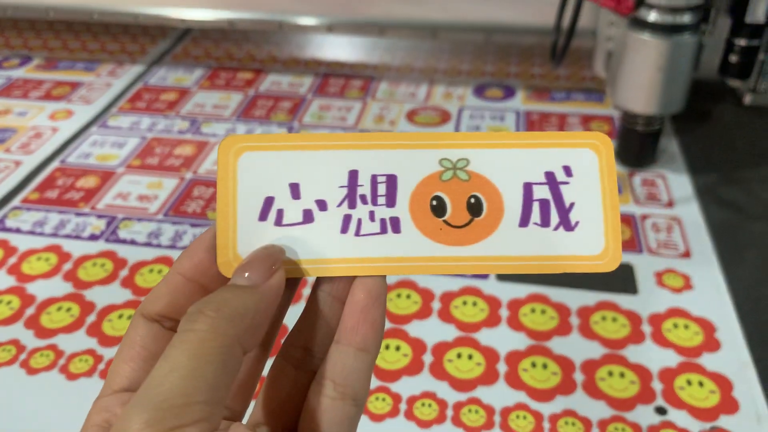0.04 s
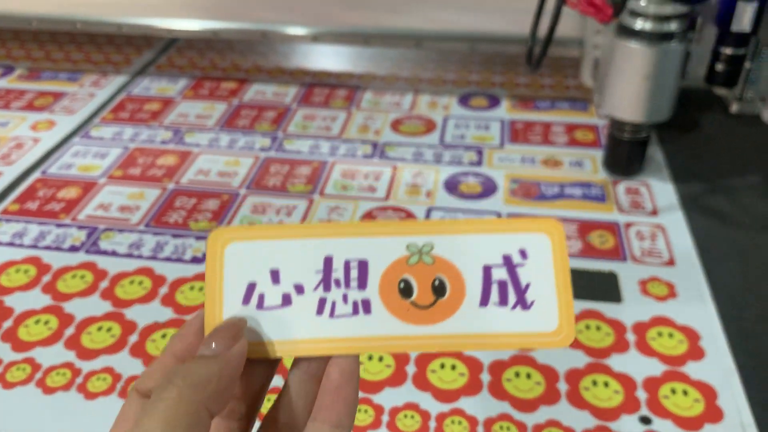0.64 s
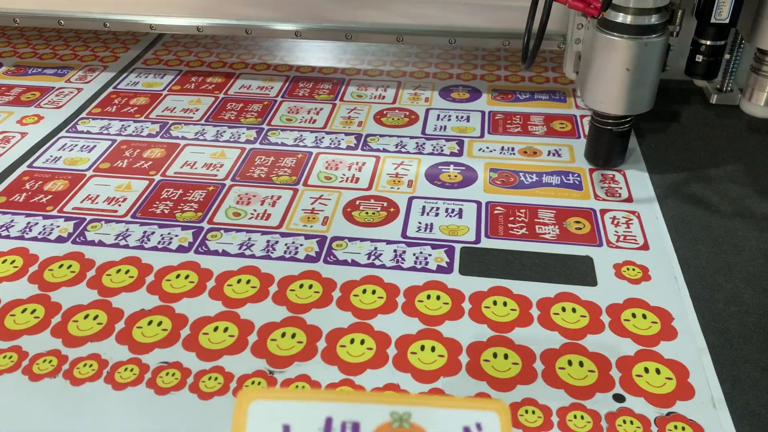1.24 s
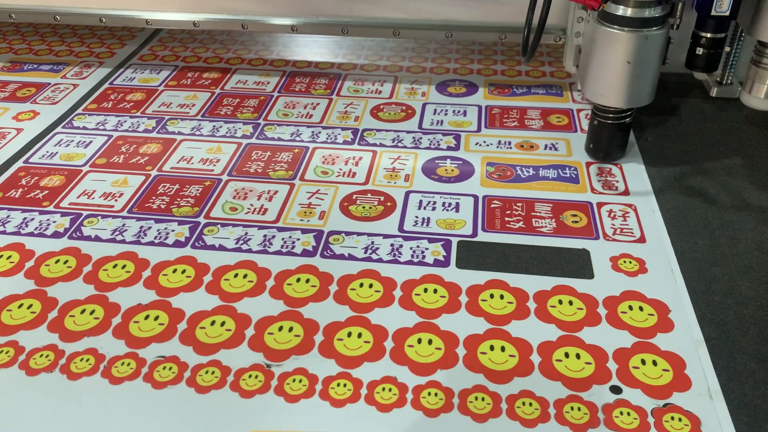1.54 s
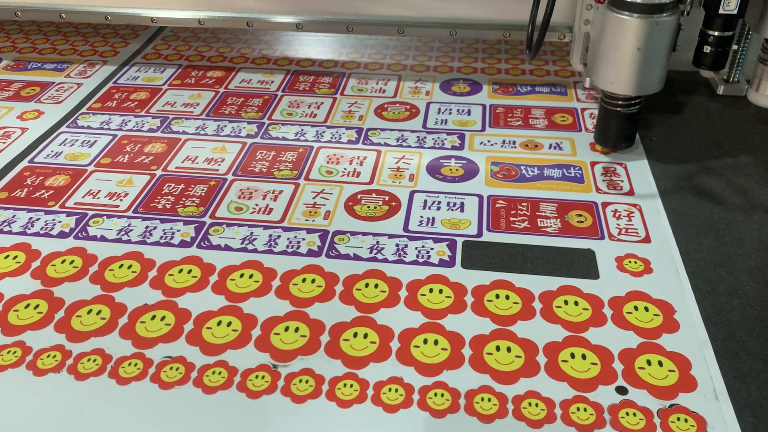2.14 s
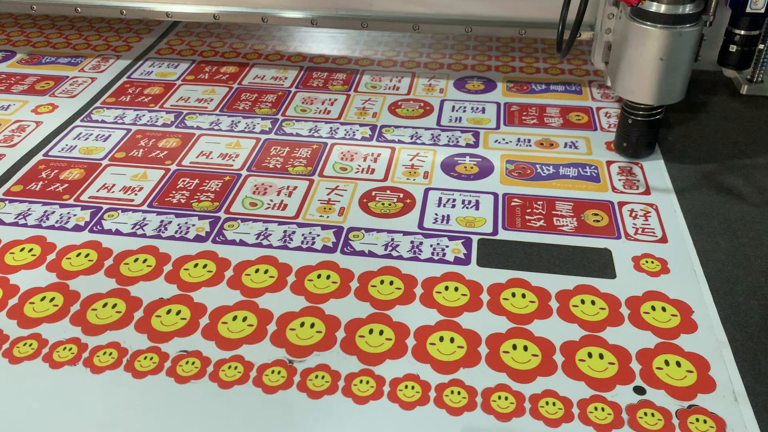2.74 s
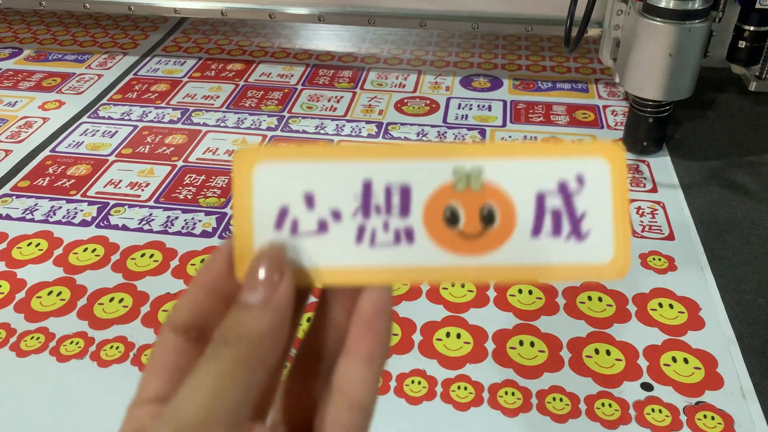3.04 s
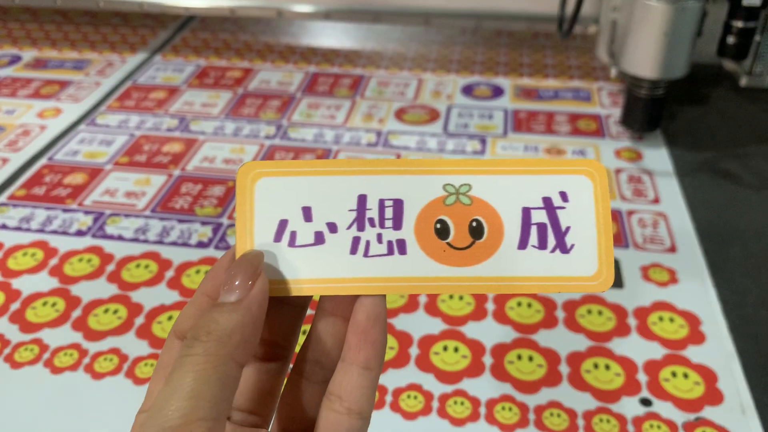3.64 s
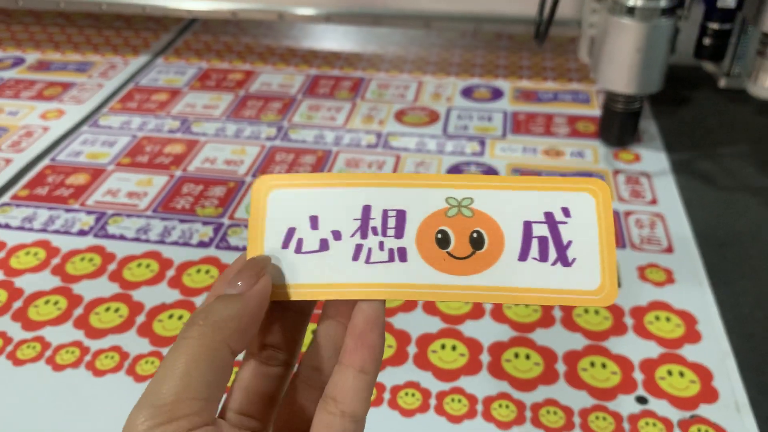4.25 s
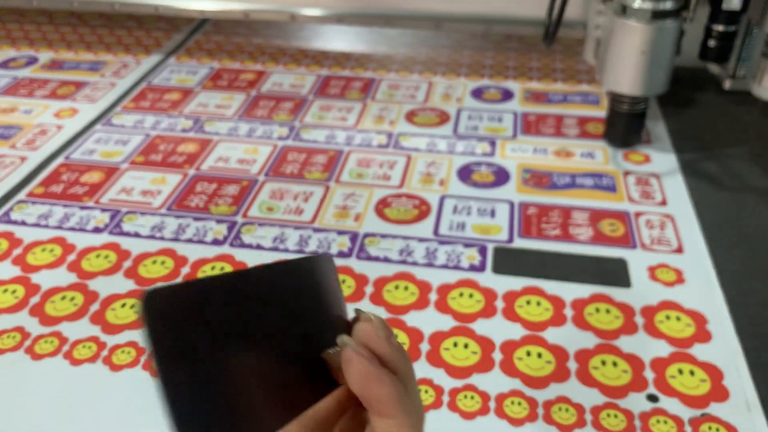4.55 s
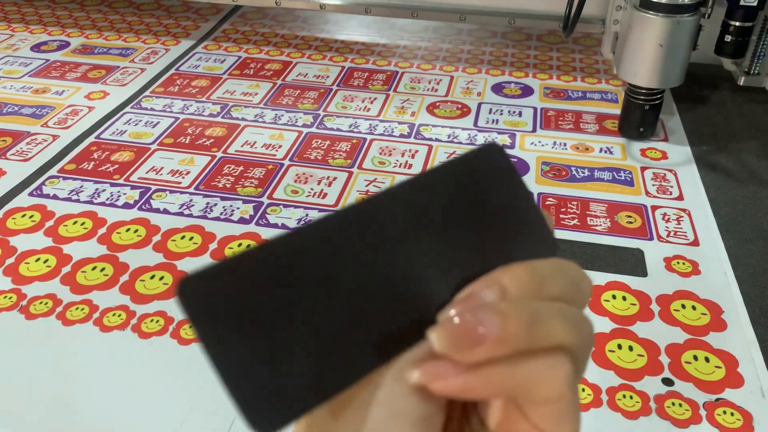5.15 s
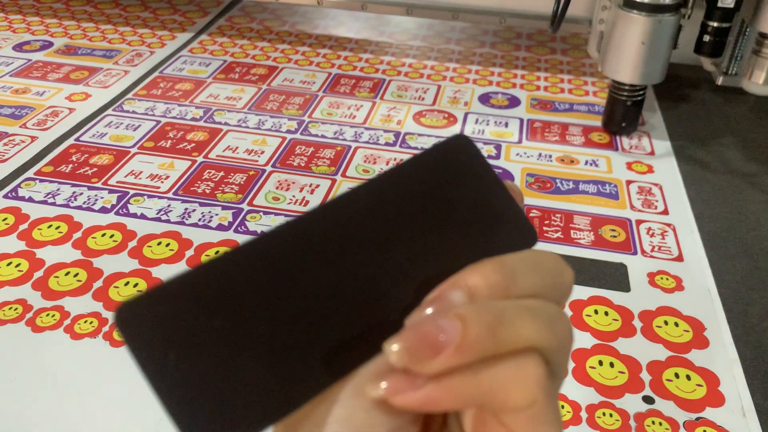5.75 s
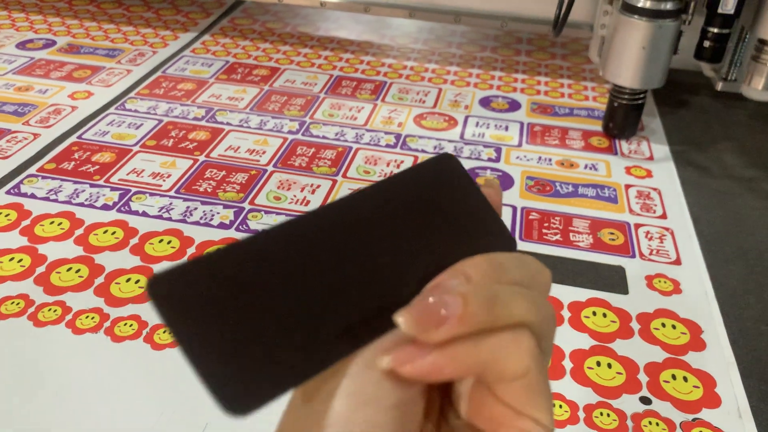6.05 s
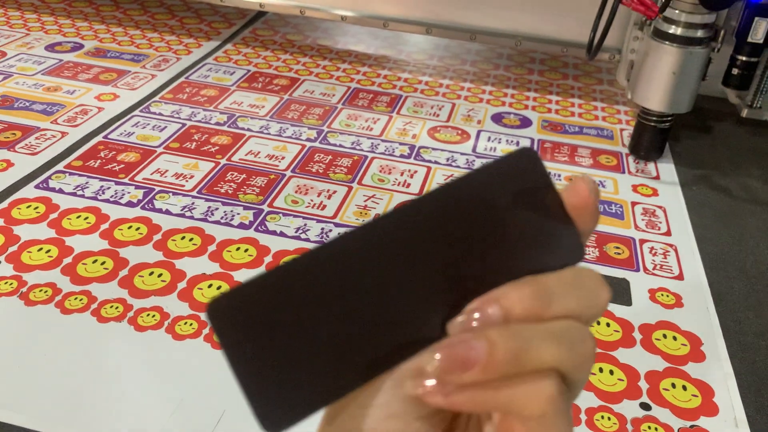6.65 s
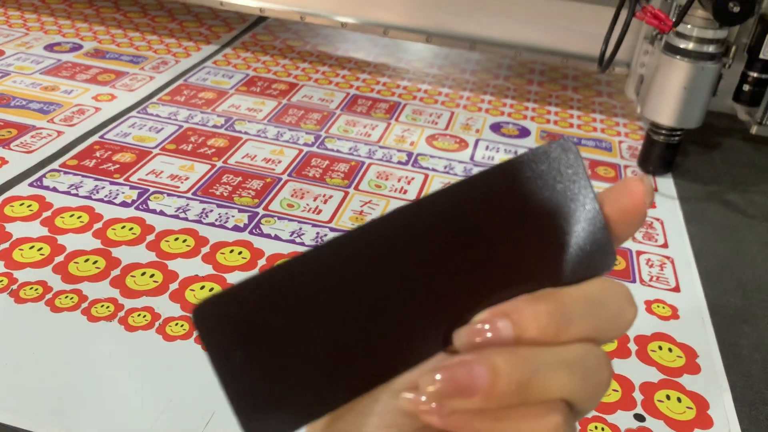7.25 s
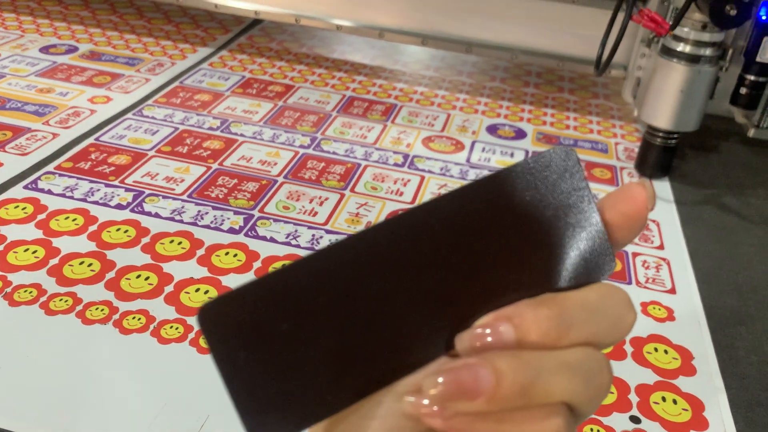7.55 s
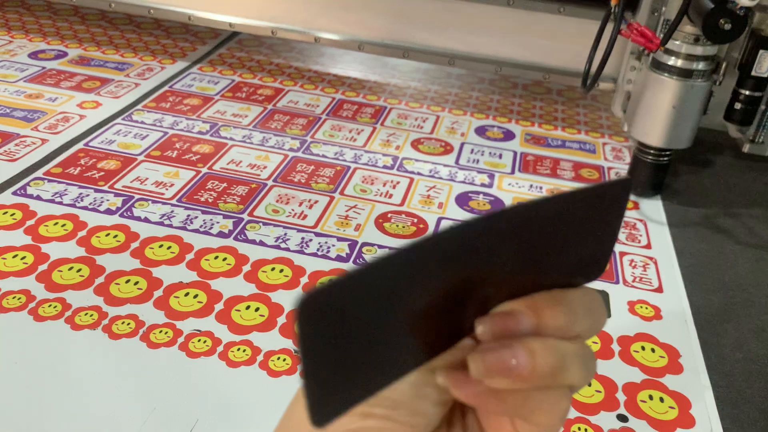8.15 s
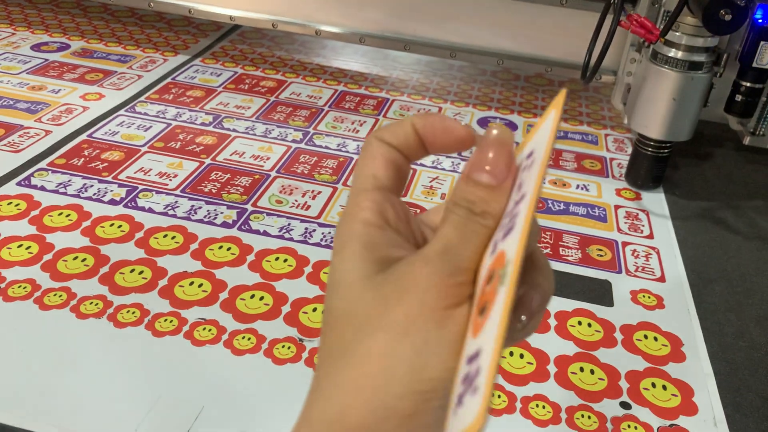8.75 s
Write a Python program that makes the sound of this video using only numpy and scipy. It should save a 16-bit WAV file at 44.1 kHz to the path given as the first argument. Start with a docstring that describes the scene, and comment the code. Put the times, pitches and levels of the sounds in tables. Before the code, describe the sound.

A flatbed cutter's oscillating knife drones throughout at one steady, fairly low pitch, close by, with a bright buzz and a grinding rasp. Beneath it a vacuum table rumbles and draws air, with a thin, steady blower tone. A short hiss at 0.4 seconds leads into a brief squeal, a scratch and a surge. Another hiss comes near 1.4 seconds, followed by slight rough wobbles and a faint squeal at 2.7. From about 3.3 to 4.7 seconds the knife works harder, with faint motor whines and a squeal at 3.8. A high hiss builds on the right from 5 to 6 seconds while the drone eases. Brief motor whines return around 6.5 and 7.7. From 7.5 seconds the buzz grows brighter and stronger, with quick, high scratches between 8.5 and 8.8, and the machine is still droning at about 9 seconds.

```python
"""Beside a flatbed cutter, a hand-held phone hears the oscillating knife drone at about 298 strokes a second.
The shaking head radiates harmonics that swell and fade as it travels, and the drive's knock at each
stroke makes a buzz. The blade grinds and rasps; at times it wobbles, hisses, squeals or scratches.
Beneath it the axis motors whine briefly, the vacuum table rumbles and draws air, and its blower sings."""
import sys
import numpy as np
from scipy import signal
from scipy.fft import rfft, irfft, next_fast_len
from scipy.io import wavfile

SR = 44100
rng = np.random.default_rng(int(sys.argv[2]) if len(sys.argv) > 2 else 0)


def output_pcm(signal):
    """Save a mono or channel-first signal as 16-bit PCM at the path in sys.argv[1].

    Samples are clipped to [-1, 1] before scaling.
    """
    pcm = np.clip(np.atleast_2d(signal).T, -1, 1) * 32767
    wavfile.write(sys.argv[1], SR, np.round(pcm).astype(np.int16))


N = 397341
TIME = np.arange(N) / SR
SIDES = np.array([[1], [-1]])  # left, right; a pan is left minus right, a lead is the left's phase advance

# coherence of noise at the two microphones: frequency_hz, correlation
COHERENCE = [(60, 0.95), (200, 0.98), (400, 0.61), (700, -0.0087), (1400, 0.08), (3000, -0.18),
             (7000, 0.22), (15000, 0.026)]
# spectra of rumble, rushing air, grinding and rasp: frequency_hz, relative_db
# (in air and rasp, the dip near 12 kHz is a gap from audio compression)
RUMBLE_SPECTRUM = [(20, -51), (38, -17.5), (50, -6.5), (68, -6), (100, 0.5), (122, -1.5), (140, 2),
                   (165, -2), (205, -2.5), (250, -11.5), (400, -34), (1000, -75)]
AIR_SPECTRUM = [(100, -17), (250, -1.5), (360, 3), (500, -12), (1000, -10.5), (1600, -19.5), (3000, -19),
                (5000, -26), (10000, -26), (11800, -42), (13200, -26.5), (15000, -41)]
GRIND_SPECTRUM = [(200, -24.5), (380, -3.5), (600, 4), (1000, -4.5), (1550, -6), (1800, -8), (2050, -5),
                  (2900, -11), (4500, -26)]
RASP_SPECTRUM = [(1500, -6), (2800, 0.5), (4000, 7), (5000, -1), (6300, 8), (7400, -30), (10200, 8),
                 (11700, -9), (13000, -7), (15000, -9)]
# steady tones of the blower: pitch_hz, level_db, lead_rad
BLOWER_TONES = [(990, -64, 0.74), (1166, -47, 0.65), (1766, -51, 2.05), (2780, -61, 2.8),
                (2840, -50.5, 2.56)]
# whines of the axis motors: start_s, end_s, first_hz, last_hz, level_db
AXIS_MOVES = [(3.26, 3.48, 872, 888, -41), (3.68, 3.86, 905, 950, -40), (3.78, 4.05, 465, 512, -36),
              (6.38, 6.699, 617, 616, -39), (6.44, 6.88, 922, 906, -40), (6.461, 6.66, 1232, 1235, -39),
              (6.541, 6.68, 877, 830, -38), (7.578, 7.861, 715, 745, -43), (7.62, 7.921, 980, 1000, -45)]
# hisses that build up and stop: start_s, end_s, level_db
HISSES = [(.4, 0.518, -43), (1.25, 1.52, -44), (5.1, 6.041, -45.5)]
# scratches of the blade: start_s, end_s, centre_hz, peak_db
SCRATCHES = [(.62, .76, 9300, -45), (2.194, 2.24, 9400, -44), (4.33, 4.4, 9000, -43),
             (8.46, 8.505, 6180, -37), (8.455, 8.512, 8600, -43), (8.56, 8.61, 8900, -48),
             (8.74, 8.804, 9790, -46), (8.76, 8.805, 6390, -39)]
# spectrum of a scratch: ratio_to_centre, relative_db
SCRATCH_SPECTRUM = [(.6, -31), (.85, -16), (1, -2), (1.15, -8), (1.5, -35)]
# squeals as the blade turns in the sheet: start_s, end_s, top_hz, level_db
SQUEALS = [(.58, 0.707, 1900, -38.5), (1.5, 1.616, 1910, -50), (2.6, 2.74, 1896, -45),
           (3.725, 3.885, 1944, -37.5)]
# spells in which the tool rocks: start_s, end_s, rate_hz, level_db
WOBBLES = [(1.42, 1.65, 140.7, -55), (1.717, 2.03, 151, -49), (2.62, 2.76, 147, -55),
           (2.833, 3.15, 146, -47.5), (3.721, 3.949, 155.5, -51), (4.12, 4.55, 149.6, -53),
           (5.195, 5.62, 153.5, -49), (5.62, 5.949, 167.6, -45.5), (8.802, 9.051, 152, -45)]
# sidebands of the rocking: harmonic_number, side (+1 above, -1 below), relative_db
SIDEBANDS = [(1, 1, 0), (2, 1, 2), (5, -1, 0.5), (6, -1, -16), (7, -1, -7), (10, -1, -25)]
# line spectrum of the buzz: frequency_hz, relative_db
BUZZ_SPECTRUM = [(2080, 2), (2400, 0), (2680, 2), (3000, 3), (3550, 0.5), (3870, -3), (4170, -1.5),
                 (4760, -1), (5350, -1), (6000, -2.5), (6550, 2), (7200, -3), (7800, 6), (8500, 1),
                 (10000, -3), (11300, -10), (15000, -12)]
# phase difference of the buzz between the microphones: frequency_hz, lead_rad
BUZZ_LEAD = [(2080, 0.3), (2380, 1.5), (2680, 2), (3270, 4.5), (3570, 4), (4000, 6), (5050, 4), (5950, 4.5),
             (6550, 8.5), (8400, 8.5), (10500, 7.5), (15000, 12)]
# level difference of the buzz between the microphones: frequency_hz, pan_db
BUZZ_PAN = [(2700, -0.5), (4200, -0.5), (5900, -13.5), (7000, -2), (10000, -2), (14000, 1)]
# harmonics 1 to 6 of the drone: usual_db, db_per_surge_db, lead_rad, wander_rad
DRONE_HARMONICS = [(-15, 0, -0.34, 0.094), (-35.5, 1.28, -0.72, 0.51), (-48, 0.5, 0.93, 0.33),
                   (-45, 0.5, 1.15, 0.25), (-50, 0.75, -0.6, 0.56), (-45.5, 0, -1.5, 0.92)]
# spells in which one harmonic of the drone or buzz swells: start_s, end_s, harmonic_number, level_db
HARMONIC_SWELLS = [(.63, .78, 5, -49), (.68, .83, 9, -44), (.7, .76, 6, -46), (.71, .83, 7, -49),
                   (.7, 1.25, 13, -54.5), (.76, .92, 20, -50), (.9, 1.02, 7, -52), (.9, 0.997, 6, -50),
                   (0.948, 1.42, 19, -53), (1.3, 1.47, 14, -53), (1.25, 1.72, 6, -60),
                   (1.34, 1.47, 16, -49.5), (2.278, 2.64, 19, -53), (2.33, 2.613, 5, -61),
                   (2.35, 2.618, 6, -52.5), (2.35, 2.65, 9, -52), (2.45, 2.57, 16, -52),
                   (3.09, 3.423, 6, -56), (3.1, 3.42, 4, -45), (3.17, 4.595, 3, -38), (3.24, 3.5, 7, -53),
                   (3.698, 3.879, 5, -48), (3.748, 5.4, 4, -41), (3.8, 4.15, 22, -50),
                   (3.85, 3.93, 9, -40.5), (3.9, 4.597, 5, -40.5), (3.88, 4.5, 14, -52),
                   (4.02, 4.19, 9, -45), (4.31, 4.43, 9, -42), (4.55, 4.7, 6, -51), (4.603, 5.72, 3, -38.5),
                   (4.778, 4.95, 7, -50), (4.8, 5.15, 14, -53), (5.72, 7.551, 3, -47.5),
                   (6.296, 7.07, 5, -44), (7.33, 8.15, 7, -47.5), (7.412, 7.58, 4, -44),
                   (7.434, 8.365, 5, -36.5), (7.56, 8.606, 3, -34.5), (7.6, 7.8, 13, -58),
                   (7.62, 8.25, 19, -59), (7.62, 8.197, 29, -45), (7.648, 8.3, 15, -47.5),
                   (7.7, 8.22, 12, -44.5), (7.7, 8.4, 8, -45), (7.7, 8.25, 17, -54), (7.8, 8.15, 22, -46),
                   (7.9, 8.65, 11, -53), (8.16, 8.299, 7, -44), (8.25, 8.802, 9, -47), (8.35, 8.6, 4, -47),
                   (8.386, 8.84, 5, -40.5), (8.4, 8.52, 7, -49), (8.612, 8.73, 15, -43.5),
                   (8.8, 9.102, 3, -34.5), (8.812, 9.1, 4, -39)]
# stretches where a reflection weakens one harmonic: start_s, end_s, harmonic_number, gain_db
CANCELLATIONS = [(.82, .89, 6, -16), (0.883, 1.055, 2, -9), (.9, 1.25, 5, -10), (.92, 1.218, 4, -17),
                 (1.73, 1.955, 6, -11), (1.75, 2.28, 5, -8), (2.13, 2.396, 2, -11), (2.78, 3.054, 6, -13),
                 (3.174, 3.3, 2, -10), (3.45, 3.719, 4, -2), (3.573, 3.867, 6, -4), (4.15, 4.52, 6, -1.5),
                 (4.8, 8.35, 6, -6), (8.7, 9.099, 6, -5.5), (4.85, 5.8, 2, -4.5), (7.03, 7.351, 4, -16),
                 (7.237, 8.328, 2, -9)]
# surges in which the knife works harder: start_s, end_s, overtone_gain_db, buzz_gain_db, scrape_gain_db
SURGES = [(0.59, 0.825, 5.5, 4.5, 6), (1.3, 1.6, 0.5, 2.5, -1.5), (2.3, 2.765, 0.5, 1.5, 0.5),
          (3.337, 3.76, 2.5, 0, 1), (3.52, 3.74, 3, -4.5, -3), (3.774, 4.013, 6.5, 3.5, 3),
          (4.026, 4.751, 5, 2.5, 3), (5.65, 5.95, -1, -3.5, 2), (6.54, 6.705, 2, 1, 3),
          (7.58, 8.273, -4, 7.5, 2), (8.293, 8.793, -3, 4, 1), (8.834, 9.11, 5.5, 1, 4.5)]
# loudness contour of the knife: time_s, level_db
KNIFE_LEVEL = [(0.03, -16), (0.4, -15), (0.45, -18), (0.77, -13.5), (1.17, -15), (2.0, -15), (2.07, -16),
               (2.47, -14.5), (2.94, -16), (3.22, -15), (3.34, -16), (3.84, -13), (4.46, -13),
               (4.84, -16.5), (5.76, -16.5), (6.13, -17.5), (8.72, -12.5), (8.97, -13)]
# speed of the knife motor, which slows a little under load: time_s, stroke_hz
STROKE_RATE = [(0, 297.8), (1.5, 297.6), (2.15, 298.6), (2.5, 297.7), (3.45, 298.7), (3.62, 298.5),
               (4.4, 297.4), (4.65, 298.6), (5.1, 298.1), (7.45, 297.2), (7.65, 297), (8.2, 296.7),
               (8.72, 298.1), (9, 297)]
# parts that follow the knife: usual_db, db_per_knife_db, db_per_surge_db
LOW_BUZZ, HIGH_BUZZ = (-48.5, 1.1, 0.66), (-48.5, 0.73, 1.22)
GRIND, RASP = (-41.5, 0.4, 0.85), (-46.5, 0.87, 0.81)


def undb(db):
    """The decibel scale: 20 dB is a tenfold amplitude."""
    return 10 ** (np.asarray(db) / 20)


def unit(x):
    """Normalisation to rms 1."""
    return x / np.sqrt(np.mean(x ** 2))


def contour(points):
    """Linear interpolation of (time_s, value) points at every sample."""
    return np.interp(TIME, *np.transpose(points))


def lookup(points, hz):
    """Interpolation of (frequency_hz, value) points on a logarithmic frequency axis."""
    known_hz, value = np.transpose(points)
    return np.interp(np.log(np.maximum(hz, 1)), np.log(known_hz), value)


def walk(rate_hz):
    """Band-limited noise: a smooth wander of spread 1 through rate_hz random values a second."""
    steps = rng.standard_normal(int(rate_hz * N / SR) + 4)
    fine = signal.resample(steps, len(steps) * 10)
    return np.interp(TIME * rate_hz * 10, np.arange(len(fine)), fine)


def swell(start, end):
    """A raised-cosine envelope between two moments."""
    return np.sin(np.pi * np.clip((TIME - start) / (end - start), 0, 1)) ** 2


def held(start, end, ramp_s):
    """A flat-topped envelope with smooth ramps centred on start and end."""
    inside_s = np.minimum(TIME - start, end - TIME)
    return np.sin(np.pi / 2 * np.clip(inside_s / ramp_s + .5, 0, 1).astype(np.float32)) ** 2


def noise(spectrum, pan_db=0):
    """Partial coherence: coloured noise, alike at both microphones in the bass, unrelated in the treble."""
    size = next_fast_len(N)
    hz = np.arange(size // 2 + 1) * SR / size
    mid, side = rfft(rng.standard_normal((2, size)))
    correlation = lookup(COHERENCE, hz)
    pair = mid * np.sqrt(1 + correlation) + SIDES * side * np.sqrt(1 - correlation)
    coloured = irfft(pair * undb(lookup(spectrum, hz)), size)[:, :N]
    return unit(coloured) * undb(SIDES * pan_db / 2)


def tone(phase, lead):
    """Phase difference: a sinusoid of rms 1 reaches the left microphone lead radians early."""
    return np.sqrt(2) * np.cos((phase % (2 * np.pi) + SIDES * lead / 2).astype(np.float32))


def vacuum_table(air_db=-35, rumble_db=-33.5):
    """Superposition: broadband airflow and rumble add to the blower's tones, all nearly steady."""
    air = noise(AIR_SPECTRUM, pan_db=-1.5) * undb(air_db + 1.62 * walk(6))
    rumble = noise(RUMBLE_SPECTRUM, pan_db=-0.5) * undb(rumble_db + 0.7 * walk(3.1))
    blower = sum(undb(db) * tone(2 * np.pi * hz * TIME + walk(7), lead) for hz, db, lead in BLOWER_TONES)
    return air + rumble + blower


def axis_motors():
    """Frequency glide: each short move of the head gives a faint whine that slides linearly in pitch."""
    out = np.zeros((2, N))
    for start, end, first_hz, last_hz, db in AXIS_MOVES:
        on = (TIME > start) & (TIME < end)
        hz = np.linspace(first_hz, last_hz, on.sum())
        phase = 2 * np.pi * np.cumsum(hz) / SR + .5 * walk(40)[on]
        out[:, on] += undb(db) * np.sqrt(swell(start, end)[on]) * tone(phase, rng.standard_normal())
    return out


def hiss(pulse_hz=169, depth=0.29, rise_db=13, ramp_s=0.11):
    """Amplitude modulation: a noise band near 6 kHz, on the right, pulses as the tool rocks."""
    spectrum = [(4500, -34), (5350, -3), (5800, 10), (6150, -1), (6600, -8), (8000, -32)]
    pulsing = 1 + depth * np.cos(2 * np.pi * pulse_hz * TIME + walk(14))
    envelope = 0
    for start, end, db in HISSES:
        build_db = np.interp(TIME, (start, end), (-rise_db, 0))
        envelope = envelope + held(start, end, ramp_s) * undb(db + build_db)
    return unit(noise(spectrum, pan_db=-14) * pulsing) * envelope


def scratches(phase, depth=0.57):
    """Intermittent friction: in short bursts the blade catches once a stroke, pulsing a treble band."""
    strokes = 1 + depth * np.cos(phase) + depth / 2 * np.cos(2 * phase)
    out = 0
    for start, end, centre_hz, db in SCRATCHES:
        spectrum = [(centre_hz * ratio, gain_db) for ratio, gain_db in SCRATCH_SPECTRUM]
        out = out + undb(db) * swell(start, end) * unit(noise(spectrum) * strokes)
    return out


def squeals(sag=0.1314, warble_depth=.075, flutter_db=4, lower_ratio=0.61, lower_db=-1):
    """Stick-slip friction: the turning blade sounds two ragged tones that rise a little and fall back."""
    out = np.zeros((2, N))
    for ratio, line_db in ((1, 0), (lower_ratio, lower_db)):
        warble = 1 + warble_depth * walk(260)
        flutter = unit(undb(flutter_db * walk(90)))
        for start, end, top_hz, db in SQUEALS:
            on = (TIME > start) & (TIME < end)
            arch = 1 - sag * np.linspace(-1, 1, on.sum()) ** 2
            hz = ratio * top_hz * arch * warble[on]
            envelope = undb(db + line_db) * swell(start, end)[on] ** (1 / 4) * flutter[on]
            out[:, on] += envelope * tone(2 * np.pi * np.cumsum(hz) / SR, lead=1.7)
    return out


def wobble(phase, spread_db=2):
    """Modulation sidebands: the tool rocks at about half the stroke rate, adding lines between harmonics."""
    out = np.zeros((2, N))
    for start, end, rate_hz, db in WOBBLES:
        on = (TIME > start) & (TIME < end)
        rock_phase = 2 * np.pi * rate_hz * TIME[on] + 0.12 * walk(30)[on]
        envelope = np.sqrt(swell(start, end)[on])
        for k, side, line_db in SIDEBANDS:
            offset, lead, scatter = rng.standard_normal(3)
            line = tone(k * phase[on] + side * rock_phase + np.pi * offset, lead)
            out[:, on] += undb(db + line_db + spread_db * scatter) * envelope * line
    return out


def surges(ramp_s=0.087):
    """Varying load: the gains in dB of overtones, buzz and scrape as the knife works harder."""
    return sum(np.outer(gains_db, held(start, end, ramp_s)) for start, end, *gains_db in SURGES)


def follow(part, knife_db, surge_db):
    """Power law: a part's level in dB is linear in the knife's level and in its surges."""
    usual_db, with_knife, with_surge = part
    return usual_db + with_knife * knife_db + with_surge * surge_db


def harmonic_swell(order, stroke_ramp_s=0.53):
    """Amplitude envelope: one harmonic swells in spells; shorter waves switch proportionally faster."""
    ramp_s = stroke_ramp_s / order
    return sum(undb(db) * held(start, end, ramp_s) for start, end, k, db in HARMONIC_SWELLS if k == order)


def interference_db(order, stroke_ramp_s=.15):
    """Destructive interference: a reflection lowers the level of one harmonic."""
    ramp_s = stroke_ramp_s / order
    return sum(db * held(start, end, ramp_s) for start, end, k, db in CANCELLATIONS if k == order)


def scrape(phase, knife_db, surge_db, depth=0.29, limp=0.11):
    """Sliding friction: the blade grinds, and rasps in step with its strokes, every second one harder."""
    strokes = 1 + depth * np.cos(phase) + depth / 2 * np.cos(2 * phase) + limp * np.cos(phase / 2)
    grind = unit(noise(GRIND_SPECTRUM) * undb(2.0 * walk(45)))
    rasp = unit(noise(RASP_SPECTRUM, pan_db=-0.5) * strokes * undb(2.3 * walk(70)))
    return undb(follow(GRIND, knife_db, surge_db)) * grind + undb(follow(RASP, knife_db, surge_db)) * rasp


def buzz(phase, knife_db, surge_db, odd_db=1, jitter_rad=0.029, flutter_db=1.4, drift_db=2.6):
    """Periodic impact: a knock each stroke gives harmonics 7 to 48; each drifts in level and some swell."""
    out = 0
    knock_phase = phase + jitter_rad * walk(60)  # loose timing widens the highest lines
    for orders, part in ((np.arange(7, 17), LOW_BUZZ), (np.arange(17, 49), HIGH_BUZZ)):
        pitches_hz = orders * STROKE_RATE[0][1]
        # a second knock at the turn of the stroke favours the odd lines
        weights = undb(lookup(BUZZ_SPECTRUM, pitches_hz) + odd_db * (orders % 2))
        band_gain = undb(follow(part, knife_db, surge_db) + flutter_db * walk(35)) / np.linalg.norm(weights)
        for k, hz, weight in zip(orders, pitches_hz, weights):
            amplitude = np.hypot(weight * band_gain, harmonic_swell(k)) * undb(drift_db * walk(8))
            offset = 1.46 * rng.standard_normal()
            lead = lookup(BUZZ_LEAD, hz) + 0.43 * walk(5)
            pan = undb(SIDES * lookup(BUZZ_PAN, hz) / 2)
            out = out + amplitude * pan * tone(k * knock_phase + offset, lead)
    return out


def drone(phase, knife_db, surge_db):
    """Forced vibration: the head radiates six harmonics; reflections shift the overtones between sides."""
    out = 0
    for k, (usual_db, with_surge, lead, wander) in enumerate(DRONE_HARMONICS, 1):
        # the fundamental lies to the right, nearer the middle as the knife grows louder
        pan_db = -5 + 0.24 * knife_db if k == 1 else 2 + 3.8 * walk(1.95)
        pan = undb(SIDES * pan_db / 2)
        mono_gain = abs(np.mean(pan * np.exp(1j * SIDES * lead / 2), axis=0))
        drift_db = 1.1 * np.log(k) * walk(6)
        level_db = usual_db + knife_db + with_surge * surge_db + interference_db(k) + drift_db
        flutter = undb(0.95 * np.log(k + 0.3) * walk(40))
        amplitude = (undb(level_db) + harmonic_swell(k)) * flutter / mono_gain
        offset = rng.uniform(0, 2 * np.pi)
        out = out + amplitude * pan * tone(k * phase + offset, lead + wander * walk(1.62))
    return out


def scene(waver_hz=0.2475, usual_db=-14.5):
    """Common excitation: one slightly uneven motor phase times drone, buzz, rasp, wobble and scratches."""
    stroke_hz = contour(STROKE_RATE) + waver_hz * walk(7)
    phase = 2 * np.pi * np.cumsum(stroke_hz) / SR + 0.019 * walk(22) + 0.0078 * walk(150)
    knife_db = contour(KNIFE_LEVEL) - usual_db
    overtone_db, buzz_db, scrape_db = surges()
    knife = drone(phase, knife_db, overtone_db) + buzz(phase, knife_db, buzz_db)
    blade = scrape(phase, knife_db, scrape_db) + wobble(phase) + squeals() + scratches(phase)
    return knife + blade + axis_motors() + hiss() + vacuum_table()


def record(dry, cutoff_hz=14500):
    """Band limiting: the phone's steep low-pass filter removes the highest treble."""
    return signal.sosfilt(signal.ellip(8, .2, 70, cutoff_hz, fs=SR, output="sos"), dry)


dry = scene()
out = record(dry)
output_pcm(out)
```